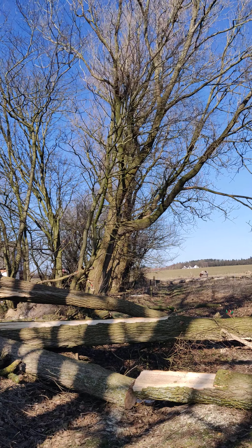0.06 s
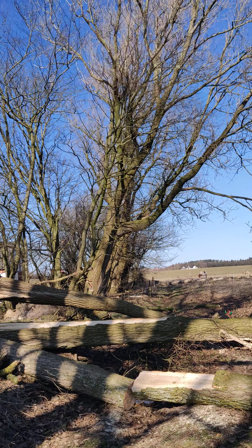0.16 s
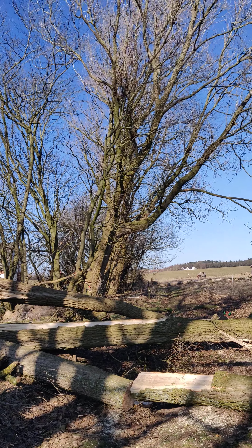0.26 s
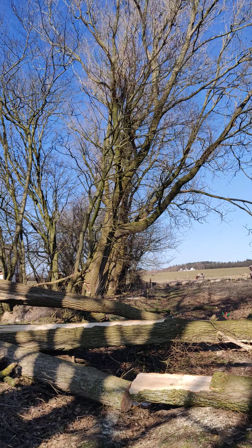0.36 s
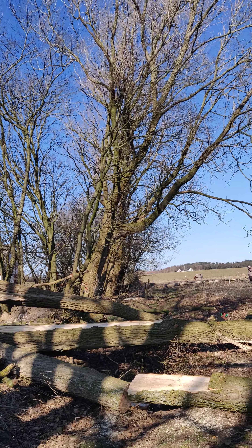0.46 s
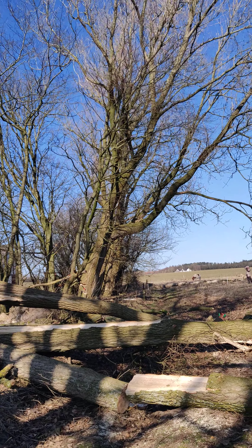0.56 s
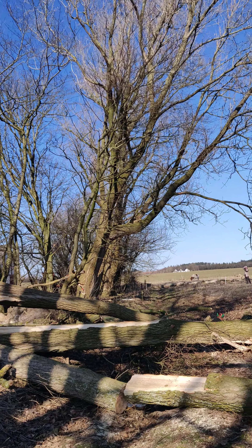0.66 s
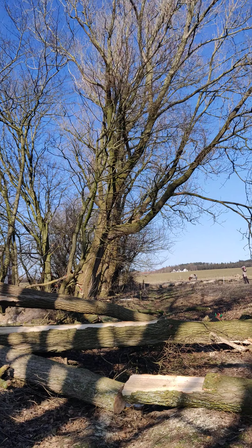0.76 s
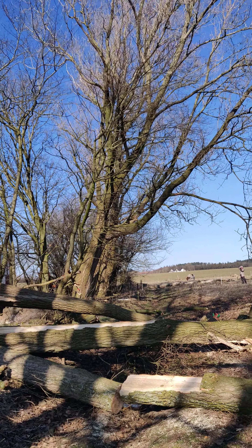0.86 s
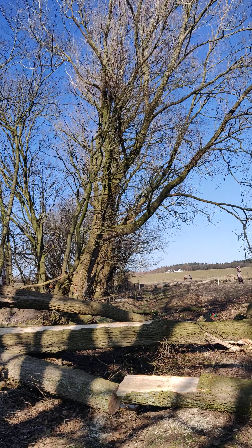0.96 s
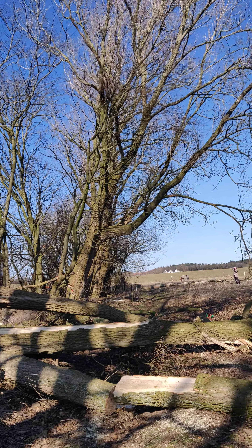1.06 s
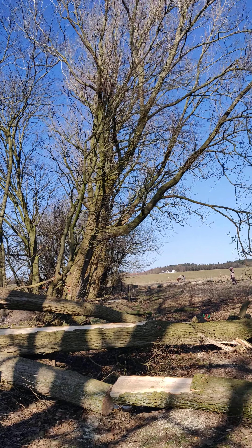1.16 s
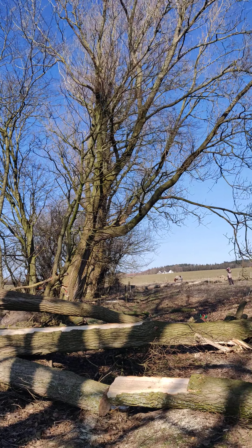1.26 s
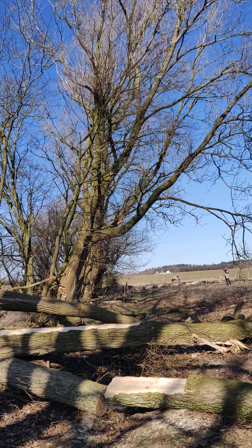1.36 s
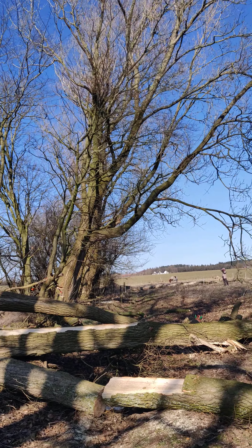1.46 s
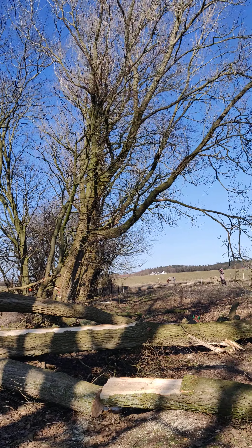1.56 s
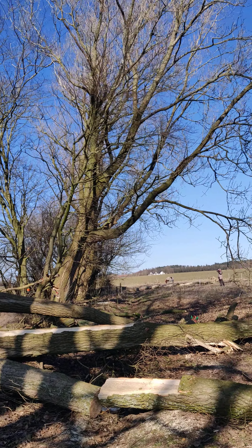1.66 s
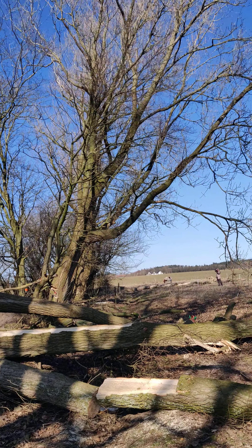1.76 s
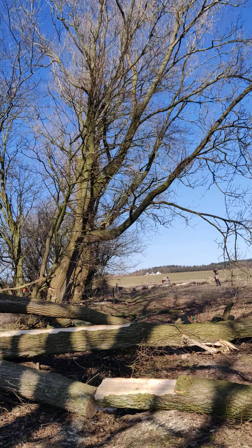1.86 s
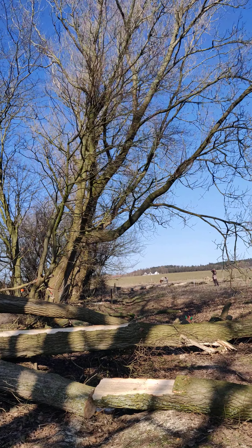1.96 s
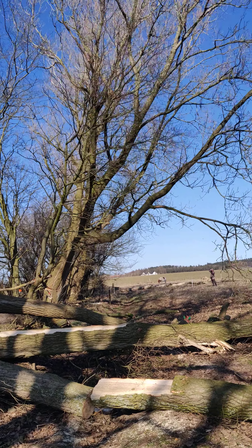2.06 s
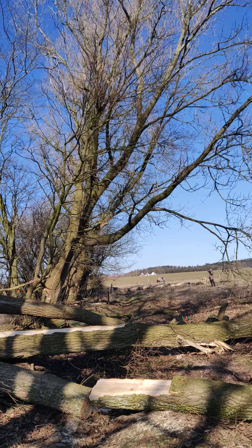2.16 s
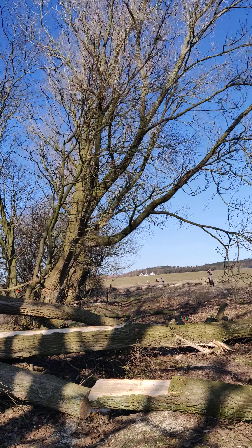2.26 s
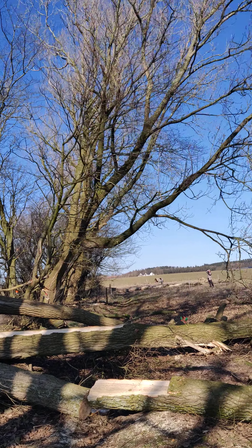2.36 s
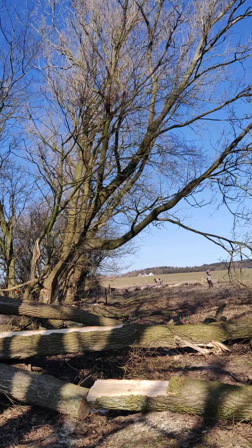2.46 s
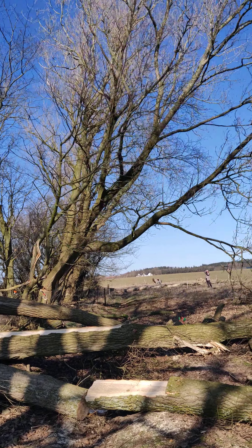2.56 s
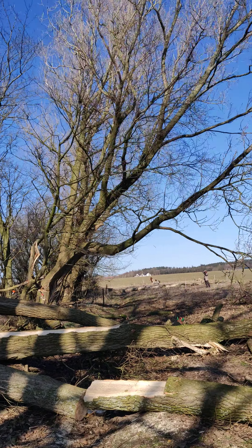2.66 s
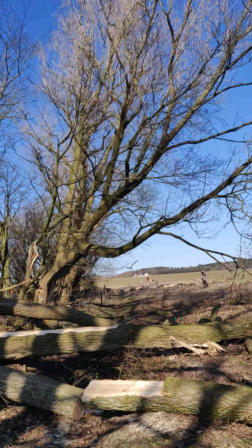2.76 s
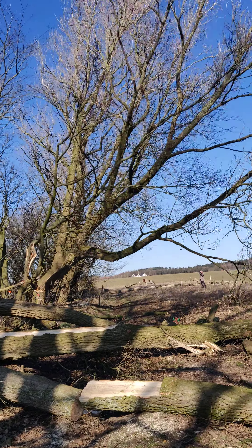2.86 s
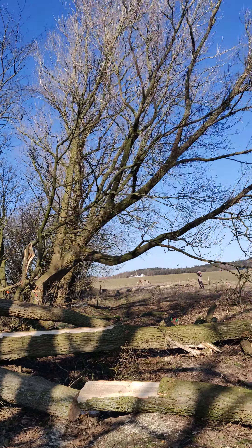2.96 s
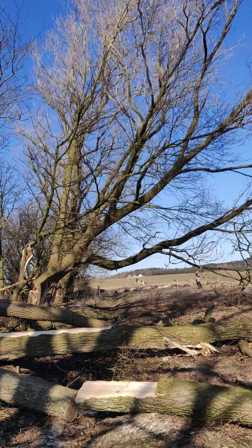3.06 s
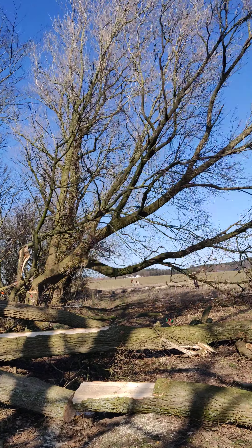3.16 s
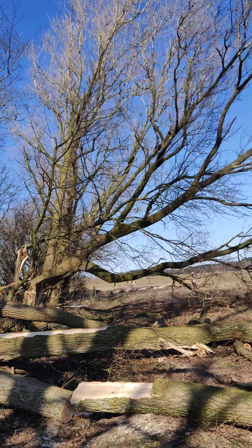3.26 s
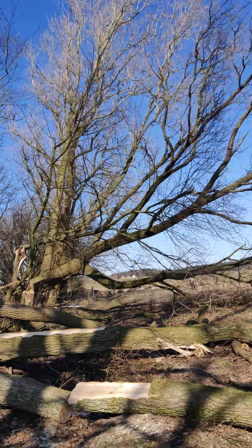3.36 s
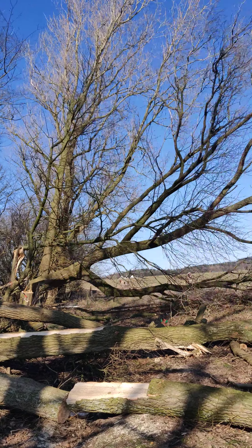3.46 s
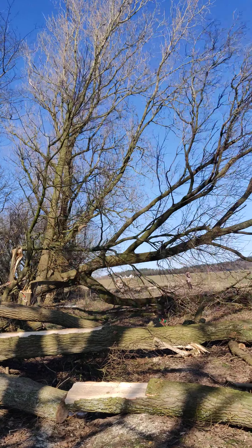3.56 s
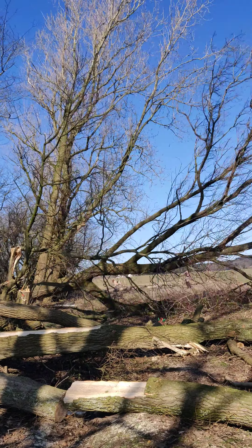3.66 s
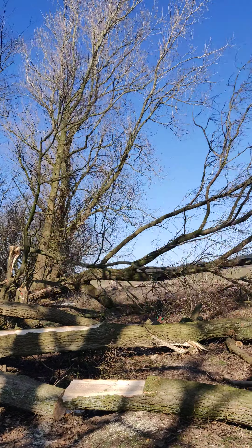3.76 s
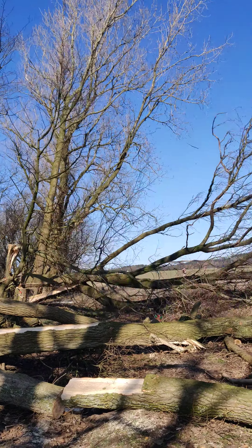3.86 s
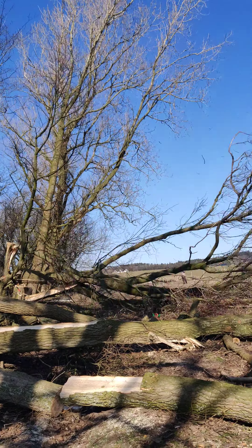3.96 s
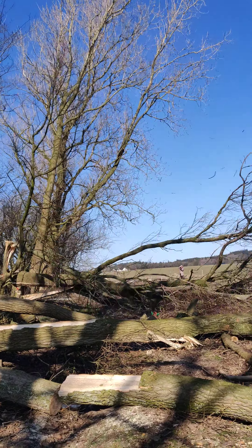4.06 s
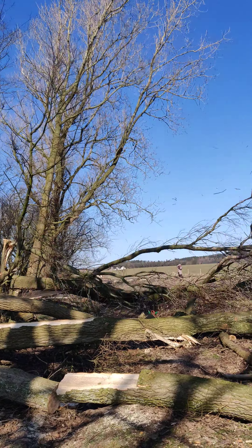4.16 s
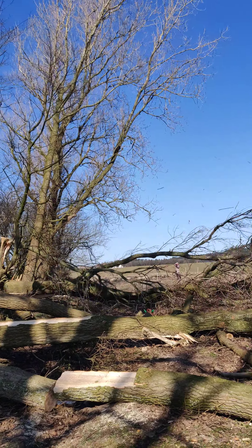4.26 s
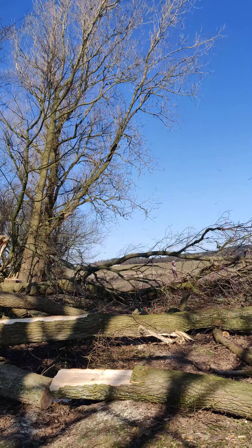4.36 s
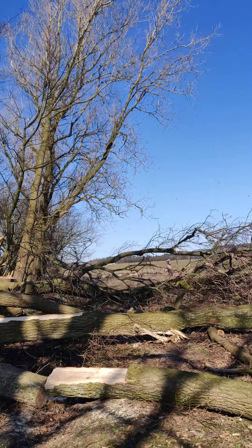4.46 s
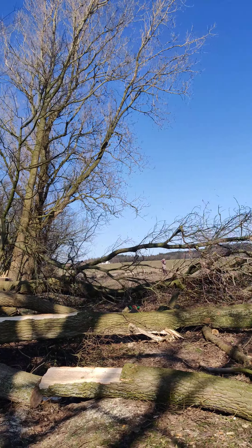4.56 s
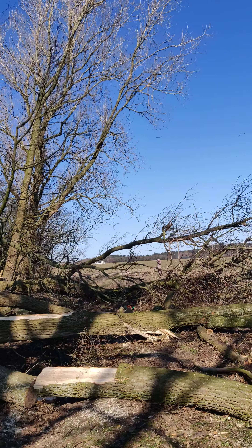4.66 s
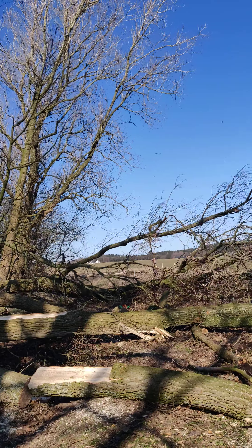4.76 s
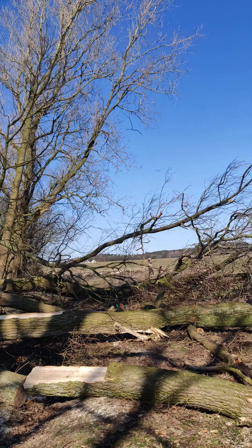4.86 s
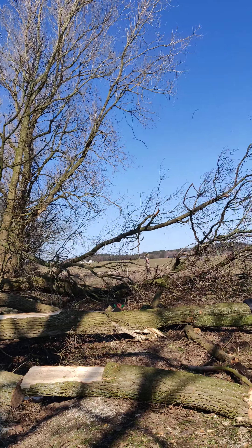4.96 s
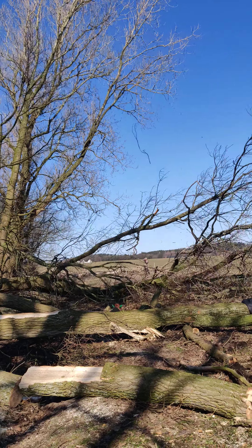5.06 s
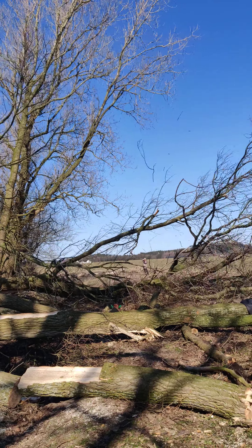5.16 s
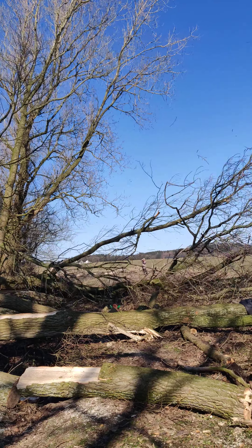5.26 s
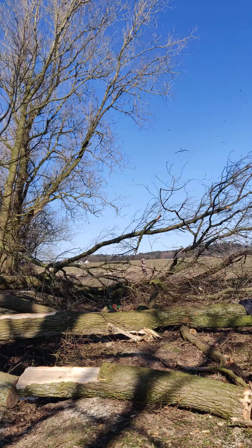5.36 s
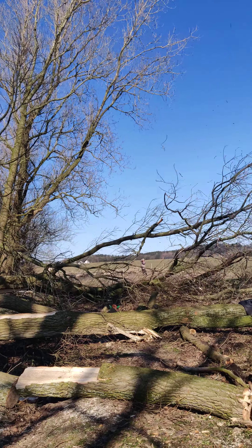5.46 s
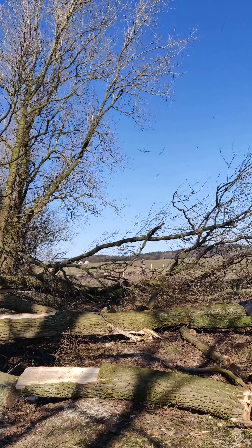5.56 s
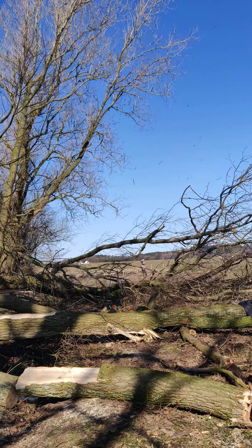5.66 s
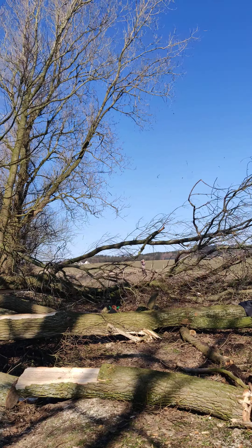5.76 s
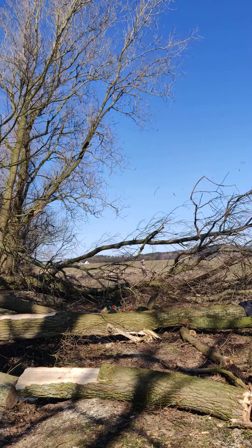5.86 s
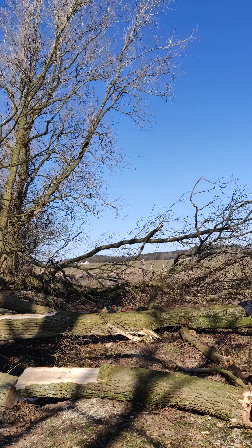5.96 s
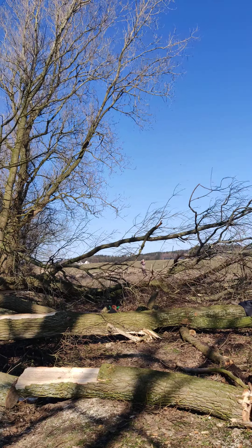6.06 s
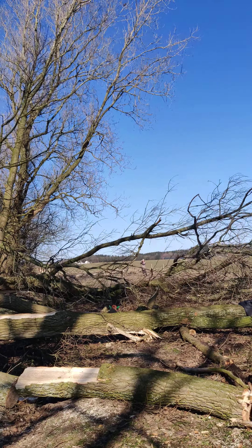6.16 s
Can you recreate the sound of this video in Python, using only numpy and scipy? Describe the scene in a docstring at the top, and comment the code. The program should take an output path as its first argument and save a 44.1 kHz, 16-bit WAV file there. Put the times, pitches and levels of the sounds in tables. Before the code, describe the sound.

A big bare tree gives way some distance off in an open field. Its trunk lets out a string of sharp cracks and hollow knocks, each with a short echo from nearby woods. The crown then sweeps down in a swelling crackle of snapping twigs, and heavy limbs thud on the ground. The brush settles with a few last snaps. Light wind rumbles on the hand-held microphone.

```python
"""A tree falls in a field

A big bare tree tears off at its base, some way from a hand-held phone. Bundles of fibres crack one after
another and the wood's edge scatters each crack back. The crown sweeps down in a swelling crackle of
twigs, limbs thud on the ground and the brush settles. A light wind touches the microphone."""
import sys
import numpy as np
from scipy import signal
from scipy.fft import rfft, irfft
from scipy.io import wavfile
from scipy.ndimage import uniform_filter1d, minimum_filter1d

SR = 44100
rng = np.random.default_rng(int(sys.argv[2]) if len(sys.argv) > 2 else 0)


def bounce(signal):
    """Save signal as a 16-bit WAV file at the path given by the first command-line argument."""
    frames = np.transpose(np.atleast_2d(signal))
    limited = np.clip(frames, -1, 1)
    pcm = np.round(limited * 32767).astype(np.int16)
    wavfile.write(sys.argv[1], SR, pcm)


N = 273711
TIME = np.arange(N) / SR
WOODLAND_T60_S = 0.54
LIMB_HZ, WOOD_HZ, SPLINTER_HZ, TWIG_HZ = (136, 524), (547, 2690), (2520, 8860), (3010, 8660)
# the left port hears the tree later, most of all the crown, which falls to the right
TRUNK_LAG_S, CROWN_LAG_S, FAR_RIGHT_LAG_S = 0.00005, 0.00009, 0.00012

# trunk and limbs breaking: t/s, time scale/ms, thump f/Hz, relative level/dB, brightness/dB
BREAKS = [(0.311, 5.04, 238, -15.5, 1), (0.369, 3.8, 266, -23.5, 4.5), (0.669, 5.5, 190, -27, 13),
          (0.857, 7.3, 296, -14, 0), (1.0997, 2.4, 287, -16.5, -3.5), (1.106, 3, 357, -20.5, 3),
          (1.2924, 4.2, 278, -18, 2), (1.5647, 2.37, 220, -11, 0), (1.573, 7.34, 202, -10.5, -4.5),
          (1.587, 4, 260, -20, 0.5), (1.593, 4, 300, -17, -1), (1.612, 3.1, 300, -19, -3),
          (1.641, 9.4, 300, -24, -6), (1.746, 2.56, 272, -22.5, 1), (1.8044, 3, 302, -21, -0.5),
          (1.899, 2.7, 263, -20, 0), (1.936, 6.9, 324, -20, 2), (1.957, 4.26, 260, -14, -10),
          (2.104, 8.6, 397, -12.5, -6), (2.116, 5.66, 336, -19, 0.5), (2.45, 11.6, 343, -14, 0.5),
          (2.472, 15, 374, -17, 3), (2.494, 18.8, 415, -15, 5), (3.55, 11.8, 352, -19, -1),
          (3.587, 6.3, 330, -18, -4), (3.611, 7.1, 350, -20, -8), (3.917, 8, 260, -14.5, 5),
          (3.938, 4.8, 280, -18, 5), (3.992, 17.5, 290, -16, -2.5), (4.015, 14, 253, -21, 3.5),
          (4.233, 21, 300, -24, -2), (4.264, 8.2, 218, -17, -3), (4.9443, 1.6, 605, -28, 10),
          (5.4315, 4.5, 605, -30.5, 12)]


def undb(db):
    """Amplitude ratio of a level in decibels."""
    return 10 ** (np.asarray(db) / 20)


def unit(x):
    """Normalisation to an rms of 1."""
    return x / np.sqrt(np.mean(x ** 2) + 1e-18)


def band(x, edges_hz):
    """Causal Butterworth band-pass."""
    sections = signal.butter(2, np.minimum(edges_hz, SR / 2 - 1), "band", fs=SR, output="sos")
    return signal.sosfilt(sections, x + 1e-18)


def colour(x, points, size=4096):
    """Minimum-phase filter through points (f/Hz, gain/dB), by folding the cepstrum."""
    hz, db = np.transpose(points)
    bins_hz = np.arange(size // 2 + 1) * SR / size
    gain = undb(np.interp(np.log(bins_hz + 1), np.log(hz), db))
    cepstrum = irfft(np.log(gain))[:size // 2]
    cepstrum[1:] *= 2
    response = irfft(np.exp(rfft(cepstrum, size)))
    return signal.fftconvolve(x, response)[:N]


def linger(x, decay_s):
    """Exponential relaxation: each impulse dies away, keeping its area."""
    pole = np.exp(-1 / (decay_s * SR))
    return signal.lfilter([1 - pole], [1, -pole], x)


def clicks(times, sizes, lags, size):
    """Path difference: each impulse reaches the left port its own lag after the right."""
    arrivals = (np.round(times * SR) + np.array([np.round(lags * SR), 0 * lags])).astype(int)
    return np.array([np.bincount(np.clip(port, 0, size), sizes, size + 1)[:size] for port in arrivals])


def add(track, sound, s):
    """Superposition of a sound on a track from time s."""
    start = int(s * SR)
    part = sound[:, :max(N - start, 0)]
    track[:, start:start + part.shape[1]] += part


def field(level_db=-43, own_db=-12):
    """Ambient noise: the steady low rush of open country, nearly coherent at the two ports."""
    air = rng.standard_normal(N) + undb(own_db) * rng.standard_normal((2, N))
    return unit(band(air, (130.8, 314))) * undb(level_db)


def wind(breeze_db=-40, own_db=2, gust_db=2):
    """Turbulence: eddies buffet the ports with low, partly coherent pressure fluctuations."""
    # soft puffs: t/s, 1/e half-width/s, relative level/dB
    puffs = [(0.62, 0.14, -32.5), (2.016, 0.15, -32), (3.1, 0.36, -41), (4.7, .3, -44), (6.1, 0.14, -29.5)]
    eddies = rng.standard_normal(N) + undb(own_db) * rng.standard_normal((2, N))
    wander = np.interp(TIME, np.linspace(0, TIME[-1], 60), rng.standard_normal(60))
    buffeting = unit(band(eddies, (18, 75)) * undb(gust_db * wander))
    swells = sum(undb(db) * np.exp(-((TIME - s) / half_s) ** 2) for s, half_s, db in puffs)
    port_gains = undb([[1], [-2]])
    return buffeting * (undb(breeze_db) + swells) * port_gains


def crush():
    """Incoherent sources add in power: the crushing of the crown is a broad swell plus sudden sprays."""
    # the tree strains, tips, hits the ground and settles: t/s, relative level/dB
    swell = [(0, -37), (0.5, -38.5), (1.5, -40.5), (2.4, -33), (2.5, -19.5), (2.67, -26), (2.8, -22),
             (2.9, -25), (3.02, -26.5), (3.41, -22.5), (3.5, -17.5), (3.62, -16.5), (3.695, -21),
             (3.78, -17.5), (3.92, -17), (4.15, -18.5), (4.452, -17.5), (4.457, -28), (4.63, -23.5),
             (5.1, -33), (6.2, -36.5)]
    # boughs caving in, each with a spray of twigs: t/s, decay/s, relative level/dB
    sprays = [(2.739, 0.17, -21.5), (3.033, 0.017, -18), (3.225, 0.017, -20.5), (3.435, 0.062, -15),
              (3.469, 0.043, -20), (3.549, 0.071, -20), (3.647, 0.027, -14.5), (3.709, 0.043, -17.5),
              (3.876, 0.08, -14.5), (3.982, 0.035, -23), (4.232, 0.067, -19), (4.422, 0.02, -13.5),
              (5.125, 0.055, -34), (5.49, 0.05, -30.5)]
    swell_power = undb(np.interp(TIME, *np.transpose(swell))) ** 2
    spray_power = sum(undb(db) ** 2 * (TIME >= s) * np.exp(-2 * np.abs(TIME - s) / decay_s)
                      for s, decay_s, db in sprays)
    return np.sqrt(swell_power + spray_power)


def weight(attack_s=0.056, release_s=0.17):
    """Transient loading: each heave on the heavy wood builds and relaxes exponentially."""
    # the weight comes down on the hinge, then limb by limb on the ground: t/s, relative level/dB
    heaves = [(2.0, -27), (3.2, -38), (3.46, -32.5), (3.59, -35), (3.78, -30), (3.9, -19.5), (4.01, -32.5),
              (4.25, -36), (4.4, -41)]
    return sum(undb(db) * np.exp(np.minimum((TIME - s) / attack_s, (s - TIME) / release_s))
               for s, db in heaves)


def crackle(rate, edges_hz, ring_s, ragged_db, echo_db, spread_s, lag_s=CROWN_LAG_S):
    """Poisson process: small fractures, rate a second, each a noise burst with a reverberant tail."""
    starts = rng.random(N) < rate / SR
    energy = starts * undb(ragged_db * np.clip(rng.standard_normal(N), -2, 2)) ** 2 / rate
    direct_power = linger(energy, ring_s)
    echo_power = undb(echo_db) ** 2 * linger(energy, WOODLAND_T60_S / np.log(10 ** 6))
    lags = lag_s + spread_s * rng.standard_normal(N)
    pressure = np.sqrt(direct_power + echo_power) * rng.standard_normal(N)
    return unit(band(clicks(TIME, pressure, lags, N), edges_hz))


def assorted(rate, edges_hz, count, **texture):
    """Size sets pitch: wood of count thicknesses crackles independently, each in its own band."""
    hz = np.geomspace(*edges_hz, count + 1)
    return unit(sum(crackle(rate, (lo, hi), **texture) * np.sqrt(hi - lo) for lo, hi in zip(hz, hz[1:])))


def crown(crunch_onset_db=-22):
    """Acoustic emission: the harder the crown is crushed, the louder and denser its wood crackles."""
    crushing, load = crush(), weight()
    branch_drive = np.hypot(crushing * undb(-3), load * undb(2))
    limb_drive = np.hypot(crushing * undb(-19), load)
    # thicker sticks, dry and sharp, stand out once the crush is hard enough
    crunch_drive = crushing * np.minimum(crushing / undb(crunch_onset_db), 1)
    activity = 300 + 1200 * crushing
    limbs = crackle(0.5 * activity, LIMB_HZ, ring_s=0.0045, ragged_db=2.5, echo_db=0.97, spread_s=8e-5)
    branches = assorted(0.3 * activity, WOOD_HZ, count=4,
                        ring_s=0.0059, ragged_db=4, echo_db=-0.62, spread_s=1e-4)
    twigs = crackle(0.7 * activity, TWIG_HZ, ring_s=0.002, ragged_db=5, echo_db=-1.5, spread_s=4e-5)
    crunch = assorted(28, (1400, 8800), count=6, ring_s=0.0009, ragged_db=4.5, echo_db=-12, spread_s=2e-5)
    soil_rumble = unit(band(rng.standard_normal(N), (62, 130)))
    return ((limbs + soil_rumble * undb(-16)) * limb_drive
            + branches * branch_drive * undb(-1)
            + twigs * crushing * undb(-0.46)
            + crunch * crunch_drive * undb(-8.5))


def woodland(edges_hz, build_s=0.0005, ragged_db=8, spread_s=0.00011, dull_hz=5000, count=800):
    """Scattering: trunks return small echoes, later ones weaker, dulled by the air; unit energy."""
    size = 16000
    times = rng.uniform(0, size / SR, count)
    sizes = rng.choice([-1, 1], count) * undb(ragged_db * np.clip(rng.standard_normal(count), -2, 2))
    sizes *= np.exp(-np.log(1000) * times / WOODLAND_T60_S) * (1 - np.exp(-times / build_s))
    echoes = clicks(times, sizes, TRUNK_LAG_S + spread_s * rng.standard_normal(count), size)
    dulled = linger(echoes, 1 / (2 * np.pi * dull_hz))
    return unit(band(dulled, edges_hz)) / np.sqrt(size)


def fracture(ms, edges_hz, db, echo_db, lag_s, fibres_per_ms=12, spread_s=2e-5, ragged_db=3, size=4400):
    """Brittle fracture: fibres part in an avalanche of impulses that dies away; the woodland answers."""
    length_s = ms / 1000
    count = int(fibres_per_ms * ms) + 2
    times = np.sort(rng.uniform(0, 2 * length_s, count))
    times -= times[0]
    sizes = rng.choice([-1, 1], count) * undb(ragged_db * rng.standard_normal(count))
    sizes *= np.exp(-0.62 * (times / length_s) ** 2)
    lags = lag_s + spread_s * rng.standard_normal(count)
    burst = band(clicks(times, sizes, lags, size), edges_hz)
    out = woodland(edges_hz) * undb(echo_db)
    add(out, unit(burst) / np.sqrt(size), 0)
    return out * np.sqrt(length_s * SR) * undb(db)


def ring(hz, decay_s, db, size, attack_cycles=0.41):
    """Damped oscillator: one mode of struck wood starts within a cycle and decays exponentially."""
    t = TIME[:size]
    attack = 1 - np.exp(-hz * t / attack_cycles)
    return undb(db) * np.sin(2 * np.pi * hz * t) * np.exp(-t / decay_s) * attack


def sticks(wood_ms=1.9, splinter_ms=0.7, width=1.43, ping_s=0.00087):
    """Impulse excitation: thin sticks snap and ping; those deep in the wood are duller and echo more."""
    # single snaps: t/s, relative level/dB, f/Hz, depth in the wood (0-1), place (0 trunk, 1 far right)
    snaps = [(0.035, -31.5, 3500, 1, .5), (0.095, -30, 6520, 0.47, 0.34), (0.199, -23.5, 5150, 0.5, 0.68),
             (0.502, -17.5, 6300, 0, 0.4), (0.621, -25, 6000, .1, 0.6), (0.639, -28, 5030, 0.78, 0.77),
             (0.746, -24.5, 5000, 0.8, 0.89), (0.7976, -15, 5660, 0.04, 0.55), (0.996, -24, 6040, 0, .5),
             (1.162, -23, 6000, .1, 0.45), (1.274, -19, 5940, .1, .5), (1.2691, -19.5, 5600, 0.44, 1),
             (1.512, -21.5, 6500, 0.33, 0.72), (2.347, -23.5, 4540, 1, 0.74), (2.689, -14, 4320, 0.86, 1),
             (2.705, -14.5, 4860, 0.76, .2), (2.7393, -6, 5670, 0.45, 0.08),
             (2.773, -19, 3500, 0.98, 0.038), (2.885, -5, 7600, 0.43, 0), (2.938, -7, 5740, 0, 0.89),
             (2.9405, -12, 6300, .2, 0.84), (2.9464, -3, 5910, 0.3, .8), (2.976, -17, 4970, 0.77, 0.34),
             (2.985, -17, 5700, .6, 0.041), (3.0305, 2, 6160, 0.3, 0), (3.0322, -3, 5630, 0.28, 0),
             (3.038, -6, 7000, .1, .15), (3.044, -9, 6430, .1, 0), (3.048, 0, 5260, 0, 0),
             (3.1189, -4.5, 4520, 0.48, 0.83), (3.164, -16, 6430, .55, 0.3),
             (3.1775, -17.5, 5860, .65, 0.43), (3.2048, -8, 5800, 0, 0.96), (3.2225, -3, 4700, 0, 0.98),
             (3.289, -16, 6070, .2, 0), (3.3002, -11, 5900, 0.15, 0.23), (3.316, -14, 5100, .2, 0.13),
             (3.366, -14.5, 6030, 0, 0), (3.44, -12.5, 6000, 0.5, 0.95), (3.469, -1.5, 5860, 0.14, 1),
             (3.4777, 2, 6290, 0.34, 0.86), (3.528, -7, 5860, 0.3, 0.17), (3.648, -8, 6630, .1, 1),
             (3.6595, 3, 5600, 0.3, 0.88), (3.6859, 5, 5400, 0, 0.91), (3.707, -2, 5900, 0.65, 1),
             (3.728, -16.5, 5500, .6, 1), (3.74, -10, 6300, .3, 0.91), (4.061, -17, 6650, 0.94, 1),
             (4.312, -11, 5920, 0, 0.63), (4.345, -20, 5500, 0.4, 0.71), (4.398, -7, 5340, 0.6, .8),
             (4.4237, -6, 5900, 0.56, 0.51), (4.436, -14, 6800, .1, 0.9), (4.446, -12.5, 5500, 0.63, 0.74),
             (4.59, -19, 5460, 1, 1), (4.603, -15, 6500, 0.3, 0.85), (4.6737, -10, 6200, 0.57, 0.62),
             (4.682, -13, 6500, 0.68, .2), (4.9449, -11, 5430, 0.6, 0.11), (5.257, -26, 7400, 0.1, 0.93),
             (5.4321, 0.5, 6100, 0.1, 0.88), (5.434, -17, 5000, 0.71, 0.33),
             (5.497, -21.5, 5970, 0.54, 0.86), (5.608, -20, 5570, 0.4, 0.89), (5.823, -28, 5500, 0.3, 1),
             (5.853, -29, 4500, 0.79, 1), (6.0244, -16.5, 4850, 0.62, 1), (6.034, -16.5, 5900, 0.5, 0.95),
             (6.1088, -15.5, 6800, 0, 1)]
    out = np.zeros((2, N))
    for s, db, hz, depth, place in snaps:
        wood_db, echo_db = db - 18 + 23.5 * depth, -14 + 15 * depth
        lag_s = FAR_RIGHT_LAG_S * place
        add(out, fracture(wood_ms, (1300, 3300), wood_db, echo_db, lag_s), s)
        add(out, fracture(splinter_ms, (hz / width, hz * width), db, echo_db, lag_s), s)
        ping = ring(hz, ping_s, db + 0.5, size=600)
        add(out, np.array([np.roll(ping, round(lag_s * SR)), ping]), s)
    return out


def trunk(thump_width=1.92):
    """Source and resonator: freed mass thumps, wood barks and splinters fly, all through the trunk."""
    # the trunk's broad, hollow resonances: f/Hz, level/dB
    body = [(110, 1.5), (150, -1), (190, -5), (250, -0.5), (340, 0), (480, 2), (620, 4), (760, 3.5),
            (1000, 4), (1270, 1.5), (1600, 3.5), (2000, 0.5), (2500, -1.5), (3100, -2.5), (3600, 0.5),
            (4200, -2.5), (5200, 2), (6100, 1.5), (7200, -6.5), (8200, 1.5), (13000, -6.5)]
    out = np.zeros((2, N))
    for s, ms, hz, db, brightness in BREAKS:
        thump_hz = (hz / thump_width, hz * thump_width)
        thump_db = db - 7 - 0.38 * brightness  # the brighter a break, the less it thumps
        add(out, fracture(1.2 * ms, thump_hz, thump_db, echo_db=0.5, lag_s=TRUNK_LAG_S), s)
        add(out, fracture(ms, WOOD_HZ, db, echo_db=0.5, lag_s=TRUNK_LAG_S), s)
        add(out, fracture(ms, SPLINTER_HZ, db + brightness, echo_db=-3.5, lag_s=TRUNK_LAG_S), s)
    return np.array([colour(side, body) for side in out])


def shreds(gain_db=-16, decay_s=0.045):
    """Stress relaxation: after each break single fibres let go in dry ticks that fade quickly."""
    s, _, _, db, brightness = np.transpose(BREAKS)
    jolts = clicks(s, undb(db + brightness) ** 2, 0 * s, N)[0]
    strain_energy = linger(jolts, decay_s / 2) * decay_s / 2 * SR
    ticks = crackle(110, (1800, 8500), ring_s=0.0003, ragged_db=3, echo_db=-18,
                    spread_s=2e-5, lag_s=TRUNK_LAG_S)
    return ticks * np.sqrt(strain_energy) * undb(gain_db)


def knocks(echo_width=1.35, echo_db=-7):
    """Free vibration: a jolted limb rings briefly at its natural frequency; the woodland returns it."""
    # whole limbs jolted or struck: t/s, decay/ms, f/Hz, relative level/dB
    blows = [(0.311, 2.9, 810, -9), (0.311, 2, 1800, -10), (0.67, 3, 480, -19), (0.668, 15, 80, -29),
             (0.858, 6.2, 327, -6), (0.86, 10.6, 95, -22), (0.858, 5, 980, -9), (0.861, 5, 740, -10),
             (0.858, 3, 1950, -13), (1.1, 3, 1500, -9.5), (1.102, 4, 728, -11), (1.177, 2.42, 1650, -12.5),
             (1.293, 3.6, 1530, -13.5), (1.573, 13.5, 94, -14.5), (1.574, 9.4, 237.3, -10),
             (1.574, 3.53, 1440, -4), (2.105, 2.5, 1760, -3), (1.958, 6.5, 360, -5), (1.953, 23, 84, -19.5),
             (2.049, 14, 86, -27), (2.119, 5.4, 330, -4), (2.458, 17.1, 89, -21.5),
             (3.253, 4.7, 124, -16.5), (3.558, 5, 700, -13), (3.588, 3.13, 1570, -7),
             (3.612, 2.1, 1650, -4), (3.708, 3.2, 1500, -8), (3.872, 13.3, 65.2, -16),
             (3.89, 8.3, 236, -7.5), (3.919, 4, 935, 0.5), (3.923, 8.2, 230, -6), (3.939, 3.5, 853, -4),
             (3.987, 5.9, 473, -11), (4.001, 3.1, 975, -3), (4.019, 10, 208, -9.5), (4.05, 2.5, 1270, -5),
             (4.062, 1.9, 1200, -4.5), (4.234, 4.8, 330, -7), (4.267, 9.5, 175, -9), (4.265, 5, 860, -8),
             (4.458, 1.86, 890, 2.5), (4.4583, 1.2, 1370, -5), (4.4593, 1.7, 620, -9),
             (4.476, 2.3, 830, -10), (4.9444, 1.08, 1790, 0), (5.4318, 0.92, 1686, -20.5),
             (6.024, 1.4, 1410, -13)]
    out = np.zeros((2, N))
    for s, ms, hz, db in blows:
        decay_s = ms / 1000
        note = ring(hz, decay_s, db, size=6000)
        echo = woodland((hz / echo_width, hz * echo_width)) * np.linalg.norm(note) * undb(echo_db)
        add(out, np.array([note, note]), s)
        add(out, echo, s + decay_s)
    return out


def scene():
    """Ground effect: the path over the field colours the breaking wood; wind and ambient noise add."""
    # response of the path over the ground, with its cancellation dip: f/Hz, level/dB
    ground = [(30, 15.5), (220, 3.5), (480, -0.5), (640, -10.5), (850, -2.5), (1250, 1.5), (1700, 2.5),
              (2600, -3), (3300, -1.5), (4500, 1.5)]
    wood = trunk() + shreds() + sticks() + knocks() + crown()
    return np.array([colour(side, ground) for side in wood]) + wind() + field()


def record(dry, ceiling=0.87, limiter_samples=90, top_hz=15800):
    """Transduction: each port has its own response; a fast limiter holds the peaks and the top is cut."""
    # responses of the two microphone ports: f/Hz, level/dB
    left_port = [(300, -1), (700, 7.5), (1300, -5.5), (3000, 2), (4400, 2), (5900, 6), (6800, -2.5),
                 (8000, -14.5), (9000, -28), (10000, -35), (12500, -20), (15500, -12)]
    right_port = [(300, -0.5), (700, 3.5), (1300, -2), (3000, 1), (4400, -3), (6200, -2.5), (8300, -1),
                  (9200, -6.5), (9900, -25.5), (10800, -44), (12500, -12), (15500, -2.5)]
    heard = np.array([colour(dry[0], left_port), colour(dry[1], right_port)])
    allowed = np.minimum(1, ceiling / (np.abs(heard) + 1e-9))
    gain = uniform_filter1d(minimum_filter1d(allowed, limiter_samples), limiter_samples)
    low_pass = signal.ellip(8, 0.2, 70, top_hz, fs=SR, output="sos")
    return signal.sosfilt(low_pass, heard * gain)


dry = scene()
out = record(dry)
bounce(out)
```